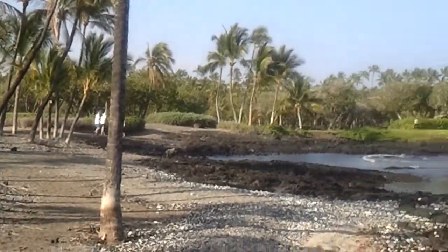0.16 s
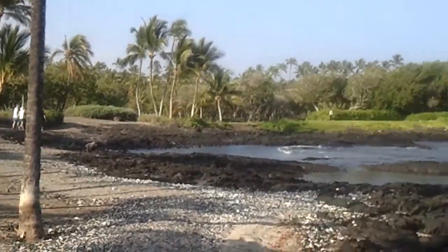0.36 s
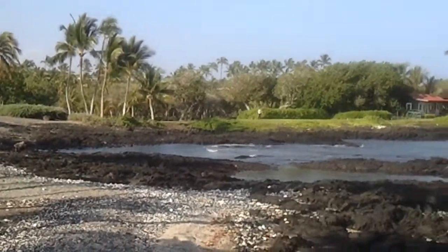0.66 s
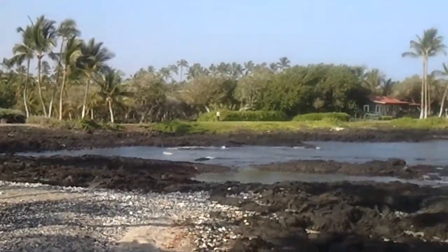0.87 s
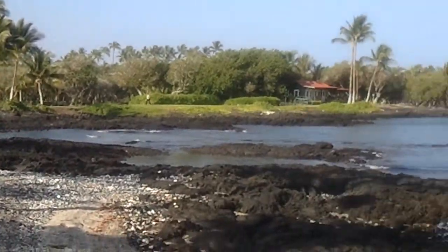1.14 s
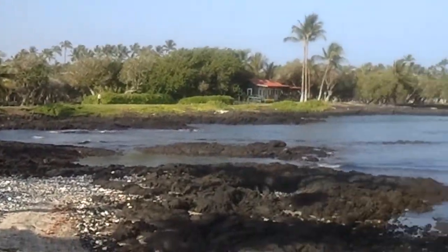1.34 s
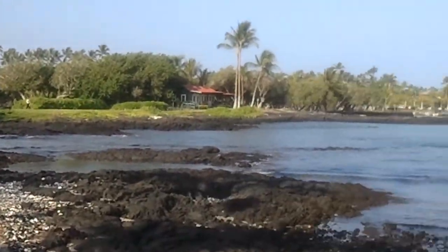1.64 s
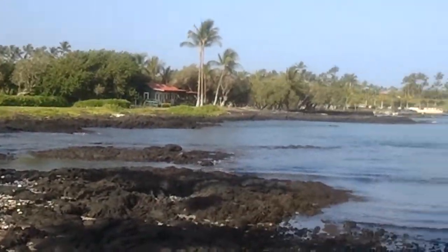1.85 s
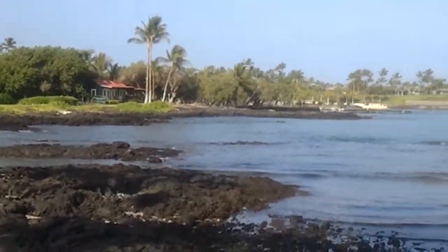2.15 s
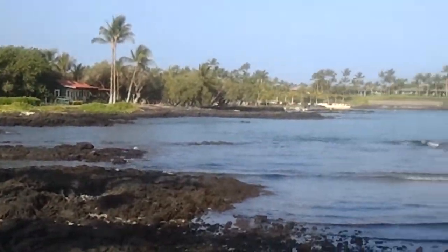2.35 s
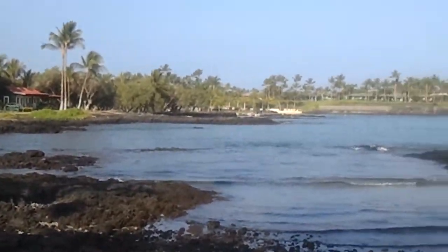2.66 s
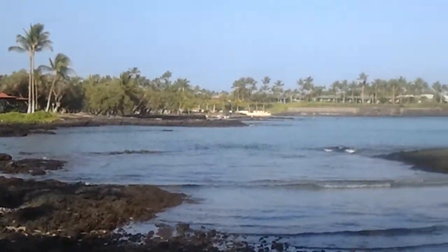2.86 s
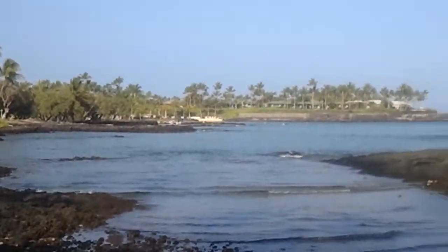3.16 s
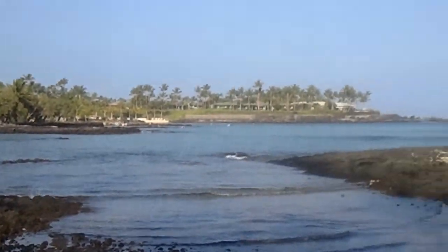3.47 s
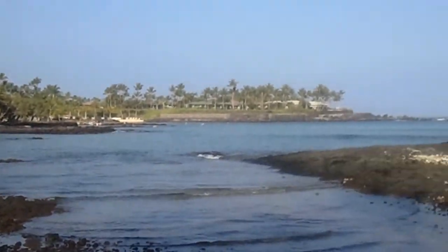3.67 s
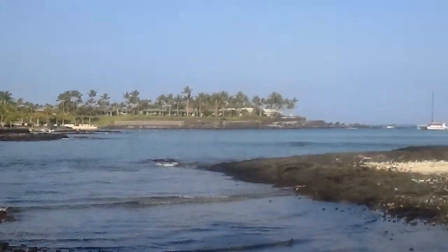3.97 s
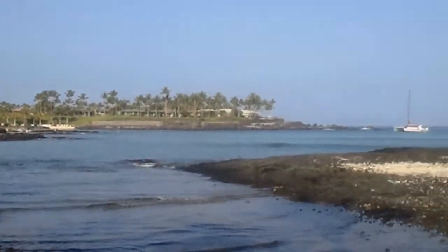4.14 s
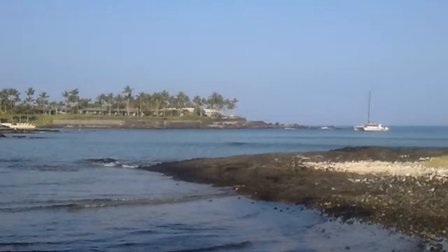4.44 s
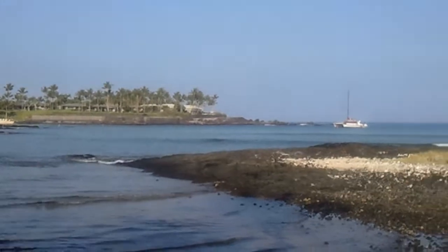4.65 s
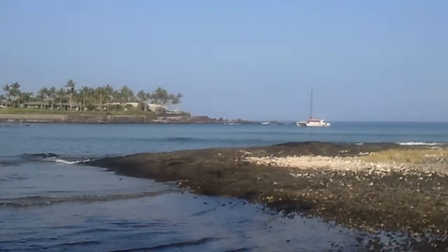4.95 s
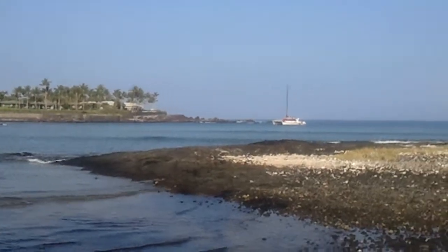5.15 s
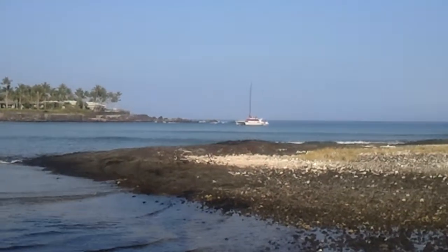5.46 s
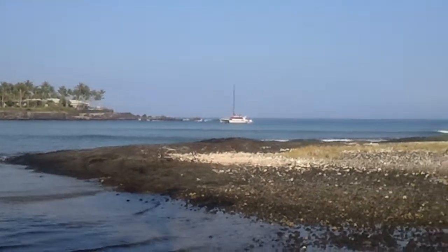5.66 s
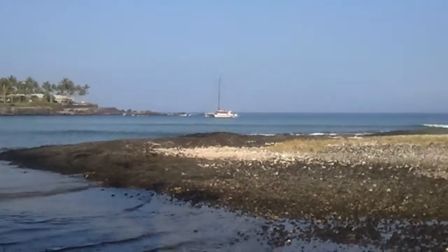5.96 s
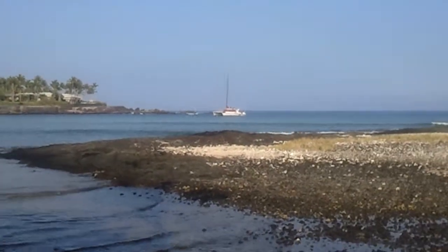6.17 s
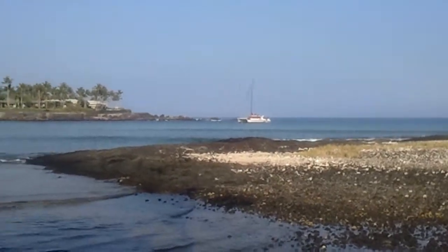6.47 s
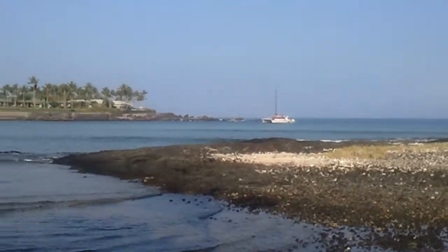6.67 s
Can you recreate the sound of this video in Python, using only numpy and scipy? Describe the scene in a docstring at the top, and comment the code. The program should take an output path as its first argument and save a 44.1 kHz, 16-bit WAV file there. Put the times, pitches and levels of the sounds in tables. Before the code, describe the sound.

On a rocky shore, distant surf and small waves make a quiet, continuous hiss. At the start, stones crunch and knock under two close steps while a nearby bird sings rapid chirps and pips. The bird soon stops, and others answer faintly from far away. A single pebble clicks midway, then the hiss shifts slightly in tone as the microphone turns seaward, with light lapping near the end.

```python
"""Gravel steps and birdsong above a rocky bay

Two steps crunch as stones slip underfoot, and a few pebbles click afterwards. A bird in the palms
whistles eight phrases (chatter and slur in turn, then pips twice); others answer from far away.
Far surf and small waves on the stones make a steady hiss, whose tone shifts as the microphone
turns seaward."""
import sys
import numpy as np
from scipy import signal
from scipy.fft import rfft, irfft, next_fast_len
from scipy.io import wavfile

SR = 44100
rng = np.random.default_rng(int(sys.argv[2]) if len(sys.argv) > 2 else 0)


def dump_mix(stems):
    """Bounce the given channels to the path in sys.argv[1] as a 16-bit WAV at rate SR."""
    frames = np.atleast_2d(stems).T  # one column per channel
    limited = np.clip(frames, -1, 1)  # hard clip at full scale
    pcm = np.round(limited * 32767).astype(np.int16)
    wavfile.write(sys.argv[1], SR, pcm)


N = 300321

# water running over the near stones: (time [s], relative level [dB])
WASH_LEVEL = [(0.0, -41.5), (0.11, -38.5), (0.51, -44), (0.62, -42), (1.5, -46), (2.09, -44), (2.16, -45.5),
              (2.47, -43), (2.71, -42), (4.42, -43.5), (4.65, -42), (6.03, -44), (6.81, -40.5)]
# the near bird's three tunes, note by note: (time in phrase [s], length [s], start pitch [Hz],
# middle pitch [Hz], end pitch [Hz], relative level [dB], rasp [0-1])
# an upward flick under a thin high arch, then two raspy falls
CHATTER = [(0, 0.076, 2600, 2720, 2450, -4.5, 0.55), (.008, .053, 3460, 3890, 3680, -5.5, .2),
           (.017, .015, 2250, 2780, 3280, 1.5, .22), (.069, .017, 3360, 2860, 2440, 1, 0.3),
           (.086, .044, 3003, 2400, 1940, -3, .6)]
# a hoarse climb, two quick drops onto a clear whistle, and a low last note
SLUR = [(0, .053, 2850, 3300, 3550, -13.5, .5), (.05, .013, 3570, 2840, 2710, -6.5, .3),
        (.062, .008, 3350, 2760, 2550, -2, 0.14), (.067, .018, 2553, 2473, 2440, 1.5, .04),
        (.085, .018, 2450, 2413, 2420, -1.5, .12), (.102, .028, 1700, 1898, 1920, -4.5, 0.19)]
# two pips, a thin squeak over the second, and a low falling rasp
PIPS = [(0, 0.0193, 3510, 3090, 3300, -4.5, 0.2), (.029, .023, 3194, 3054, 3330, 0, 0.14),
        (.033, .017, 6700, 6550, 6200, -14, .05), (.059, .068, 1786, 1454, 1290, -7, .75)]


def from_db(db):
    """Turn decibels into a number to multiply by."""
    return 10 ** (np.asarray(db) / 20)


def unit_power(x):
    """Scale a sound to an average power of 1."""
    return x / np.sqrt(np.mean(x ** 2) + 1e-20)


def add(out, s, sound):
    """Mix a sound in, starting at s seconds."""
    at = max(round(s * SR), 0)
    out[at:at + len(sound)] += sound[:N - at]


def in_time(rows):
    """Join (time, value) points with straight lines, one value per sample."""
    return np.interp(np.arange(N) / SR, *np.transpose(rows))


def band(x, low_hz, high_hz, order=2):
    """Keep the sound between two frequencies."""
    sos = signal.butter(order, [low_hz, min(high_hz, .45 * SR)], "band", fs=SR, output="sos")
    return signal.sosfilt(sos, x + 1e-18)


def drift(rate, size):
    """A random wander of about 1 either way, with rate new values a second."""
    points = rng.standard_normal(size // 8 + 2)
    return 1.2 * np.interp(np.arange(size) * rate / SR, np.arange(len(points)), points)


def swell(size, edge):
    """Fade in and out; edge is the share of time spent fading."""
    return signal.windows.tukey(size, edge)


def colour(x, spectrum, humps=()):
    """Shape the tone with a curve of level against frequency, plus rounded humps and dips."""
    size = 2 * next_fast_len(len(x) // 2 + 2048, True)
    hz = np.maximum(np.arange(size // 2 + 1) * SR / size, 1)
    points_hz, points_db = np.transpose(spectrum)
    db = np.interp(np.log(hz), np.log(points_hz), points_db)
    for centre, width, height in humps:
        db += height * np.exp(-2 * ((hz - centre) / width) ** 2)
    # make the filter ring only after a sound, never before it
    cepstrum = irfft(np.log(from_db(db)))
    cepstrum[1:size // 2] *= 2
    cepstrum[size // 2 + 1:] = 0
    return irfft(rfft(x, size) * np.exp(rfft(cepstrum)))[:len(x)]


def clicks(per_s, spread_db, size):
    """Random clicks of uneven strength, with an average power of 1."""
    strength = from_db(spread_db * np.minimum(rng.exponential(1, size), 3))
    return unit_power((rng.random(size) < per_s / SR) * strength * rng.choice([-1, 1], size))


def sea(surf_db=-0.24, wash_db=-0.5, foam_db=-51.3, spray_db=-55.0, ripple_db=0.72):
    """Surf fills the lows, wash the middle, foam and spray the top; droplets roughen the hiss."""
    # tone of the sea: (frequency [Hz], relative level [dB])
    tone = [(15, -59), (25, -29), (48, -24), (122, -6), (219, -6), (287, -4.5), (444, -6.5), (742, -1),
            (1100, -4), (1400, -4), (1970, -5.5), (2910, -8.5), (3800, -12), (7520, -20.5), (8500, -32.5),
            (11000, -63.5), (18700, -120)]
    # ground reflections, facing the cove or open water: (frequency [Hz], width [Hz], boost [dB])
    cove_humps = [(266, 260, 2), (420, 110, -2.5), (640, 140, 2), (960, 280, -3), (1236, 150, 3),
                  (1517, 150, -4.5), (1800, 330, 2), (3080, 230, -3.5)]
    open_humps = [(280, 150, 2), (457, 67, -2.5), (845, 140, 2.5), (1075, 210, -3), (1400, 200, 2.5),
                  (2120, 310, 2), (2796, 430, -3.5), (3940, 420, 4)]
    # the microphone turns: (time [s], share facing open water [0-1])
    turn = [(0, 0.05), (3.5, 0.09), (4.5, 0.53), (5.7, 0.98), (6.81, 0.99)]
    # swell of the far surf: (time [s], relative level [dB])
    surf_level = [(0.0, -48.5), (0.4, -48), (2.22, -48.5), (3.51, -45), (4.28, -47), (5.37, -47),
                  (5.78, -47.5), (6.81, -46.5)]
    seaward = in_time(turn)
    water, out = np.zeros((2, N))
    for share, humps in [(1 - seaward, cove_humps), (seaward, open_humps)]:
        hiss = rng.standard_normal(N) + 0.34 * clicks(per_s=700, spread_db=6, size=N)
        water += np.sqrt(share) * colour(hiss, tone, humps)
    surf, wash = in_time(surf_level), in_time(WASH_LEVEL)
    swing_db = 0.7 * (wash - wash.mean())   # foam and spray partly follow the wash
    layers = [(15, 900, surf + surf_db), (900, 3000, wash + wash_db),
              (3000, 4500, swing_db + foam_db), (4500, 12000, swing_db + spray_db)]
    size = next_fast_len(N, True)
    hz, spectrum = np.arange(size // 2 + 1) * SR / size, rfft(water, size)
    for low_hz, high_hz, db in layers:
        part = irfft(spectrum * ((hz >= low_hz) & (hz < high_hz)), size)[:N]
        out += unit_power(part) * from_db(db + ripple_db * drift(25, N))
    return out


def gurgle(below_wash_db=10, cycles=22):
    """Bubbles ring between the stones, each rising a little in pitch; their level follows the wash."""
    out = np.zeros(N)
    for hz in np.geomspace(600, 2400, 24):
        age = np.linspace(0, 1, int(cycles * SR / hz))
        bubble = np.sin(2 * np.pi * cycles * age * (1 + .05 * age)) * from_db(-30 * age)
        births = clicks(per_s=9, spread_db=3, size=N)
        out += unit_power(signal.oaconvolve(births, bubble)[:N])
    return unit_power(out) * from_db(in_time(WASH_LEVEL) - below_wash_db)


def lapping():
    """A small wave breaks into a burst of bubbles; a hollow in the rocks narrows its pitch range."""
    # waves slapping the rocks: (time [s], length [s], level [dB], pitch [Hz], width [share of pitch])
    slaps = [(4.58, 0.094, -46.5, 1890, 0.1), (4.911, 0.016, -46, 1600, 0.64),
             (5.085, 0.023, -44.5, 1450, 0.51), (6.313, 0.033, -48.5, 3980, 0.32),
             (6.636, 0.039, -41.5, 1700, .9)]
    out = np.zeros(N)
    for s, length, db, hz, width in slaps:
        size = int(length * SR)
        bubbles = clicks(per_s=1500, spread_db=5.6, size=SR)[:size]
        burst = band(bubbles, hz * (1 - width / 2), hz * (1 + width / 2))
        add(out, s, from_db(db) * unit_power(burst * swell(size, edge=0.9)))
    return out


def drops(decay_s=0.0006, small_per_s=1.1, small_db=-38):
    """Each drop of spray lands with a tiny bright tick; the small ones fall at random."""
    # larger drops close by: (time [s], peak level [dB])
    large = [(3.106, -33), (5.8948, -32.5), (5.954, -30.5), (6.767, -31)]
    small = [(at / SR, small_db) for at in np.flatnonzero(rng.random(N) < small_per_s / SR)]
    out, t = np.zeros(N), np.arange(SR // 200) / SR
    for s, db in large + small:
        tick = band(rng.standard_normal(len(t)) * np.exp(-t / decay_s), 2800, 7000)
        add(out, s, from_db(db) * tick / np.abs(tick).max())
    return out


def grove(x, fade_s=0.41, first_s=.006):
    """Trees and rocks scatter back many faint echoes, which fall by 60 dB in fade_s."""
    t = np.arange(SR // 2) / SR
    echoes = clicks(per_s=900, spread_db=1.1, size=len(t)) * from_db(-60 * t / fade_s) * (t > first_s)
    return signal.fftconvolve(x, echoes / np.sqrt(np.sum(echoes ** 2)))[:N]


def far_birds(width_hz=700, trill_db=1, trill_rate=80):
    """Many paths through the trees smear a far trill into a narrow, fluttering hiss."""
    # answering calls: (time [s], length [s], relative level [dB], pitch [Hz])
    calls = [(2.53, 0.17, -49.5, 3850), (2.62, 0.38, -53.5, 3830), (2.9, 0.2, -49.5, 3830),
             (3.62, .30, -54, 3660), (5.368, 0.27, -53.5, 3780), (6.571, 0.1, -52, 3850)]
    out = np.zeros(N)
    for s, length, db, hz in calls:
        size = int(length * SR)
        hiss = band(rng.standard_normal(SR), hz - width_hz / 2, hz + width_hz / 2, order=3)
        call = hiss * from_db(trill_db * drift(trill_rate, SR))
        add(out, s, from_db(db) * unit_power(call[:size] * swell(size, edge=0.45)))
    return out


def song_notes():
    """List the near bird's notes: three short tunes, repeated at varied speed and pitch."""
    # the song: (tune, time [s], length [factor], pitch [factor], relative level [dB])
    phrases = [(CHATTER, .100, .62, .93, -34), (SLUR, .227, 1.02, 1.01, -26),
               (CHATTER, .559, 0.99, 1.0, -34), (SLUR, .838, 1.02, 0.98, -26.5),
               (CHATTER, 1.146, 1.25, .94, -39), (SLUR, 1.430, .99, 1.0, -26.5),
               (PIPS, 1.798, 0.99, 1.0, -28), (PIPS, 2.098, 1.02, 0.98, -30)]
    # single notes slipped in: same columns as a tune, timed from the start of the scene
    extra_notes = [(0.082, .020, 2635, 2480, 2300, -32, 0.6), (.95, 0.027, 2205, 2083, 1840, -31.5, 0.34),
                   (1.77, 0.0097, 3400, 3920, 4400, -33, 0.2),
                   (1.775, 0.061, 4500, 4810, 4750, -42.5, 0.35),
                   (2.078, 0.022, 1990, 2105, 2080, -34, 0.2),
                   (2.162, 0.0196, 2530, 1950, 1730, -27.5, 0.1)]
    notes = []
    for tune, s, stretch, pitch, db in phrases:
        for after, length, start_hz, middle_hz, end_hz, note_db, rasp in tune:
            pitches = pitch * start_hz, pitch * middle_hz, pitch * end_hz
            notes.append((s + stretch * after, stretch * length, *pitches, db + note_db, rasp))
    return notes + extra_notes


def near_bird(wobble_hz=420, flutter_db=3.0, hoarse_db=-1, breath_db=-9, beak_hiss_db=9):
    """Each note is a bent whistle; rasp shakes its pitch and strength. Overtones ring in the beak."""
    # how wide the beak opens: (time [s], relative overtone level [dB])
    beak_opening = [(0.12, -22), (0.30, -10.5), (0.60, -17.5), (1.49, -8), (1.83, -14.5)]
    voice, overtones = np.zeros((2, N))
    longest = SR // 10
    for s, length, start_hz, middle_hz, end_hz, db, rasp in song_notes():
        size = min(int(length * SR), longest)
        bend = np.polyfit([0, .5, 1], [start_hz, middle_hz, end_hz], 2)
        wobble = rasp * wobble_hz * drift(900, longest)[:size]
        hz = np.polyval(bend, np.linspace(0, 1, size)) + wobble
        phase = 2 * np.pi * np.cumsum(hz) / SR
        flutter = from_db(np.sqrt(rasp) * flutter_db * np.minimum(drift(400, longest)[:size], 1))
        level = from_db(db) * unit_power(flutter) * swell(size, edge=0.31)
        # a raspy note trades its clear tone for noise around its pitch
        air = rng.standard_normal(longest)
        hoarse = unit_power(band(air, 0.7 * middle_hz, 1.316 * middle_hz, order=3))[:size]
        breath = np.sqrt(rasp) * from_db(breath_db) * band(air, 1000, 4200)[:size]
        whistle = np.sin(phase) / (1 + rasp ** 2)
        add(voice, s, level * (whistle + rasp * from_db(hoarse_db) * hoarse + breath))
        # tense, high notes make the beak ring most
        tension = np.clip(hz / 2600, 0, 1) ** 3
        beak_hiss = np.sqrt(rasp) * from_db(beak_hiss_db) * air[:size]
        buzz = np.sin(2 * phase) + 0.6 * np.sin(3 * phase) + beak_hiss
        add(overtones, s, level * tension * buzz)
    beak = from_db(in_time(beak_opening)) * band(overtones, 6070, 7120, order=3)
    return np.sqrt(2) * (voice + beak)


def pebbles(crack_hz=3400, crack_fade_s=0.0022, soft_cycles=15, hard_cycles=3.2):
    """A pebble rings until the gravel stills it; a harder knock cracks more and dies sooner."""
    # single pebbles knocking: (time [s], peak level [dB], pitch [Hz], hardness [0-1])
    knocks = [(0.04, -9, 1580, 0.5), (0.0557, -10.5, 1170, 0.75), (0.0640, -9.5, 1120, 0.1),
              (0.0907, -14, 1460, 0.3), (0.2938, -11.5, 1523, 0.4), (0.3053, -16.5, 1400, 0.57),
              (0.4866, -13, 1240, 0.33), (0.5085, -3.5, 1572, 0), (0.5122, -10, 1460, 0.2),
              (0.6635, -18, 1830, .5), (1.0917, -26, 5480, 0.1), (2.0620, -25, 2600, .8),
              (2.0722, -27, 2580, .8), (3.3688, -15.5, 1600, 0.93)]
    out, t = np.zeros(N), np.arange(SR // 40) / SR
    for s, db, hz, hardness in knocks:
        fade_s = np.interp(hardness, [0, 1], [soft_cycles, hard_cycles]) / hz
        ring = np.sin(2 * np.pi * hz * t) * from_db(-60 * t / fade_s)
        crack = np.sin(2 * np.pi * crack_hz * t) * from_db(-60 * t / crack_fade_s)
        knock = band(ring + hardness * crack, 550, 7200)
        add(out, s, from_db(db) * knock / np.abs(knock).max())
    return out


def footsteps(touch_db=-5, lift_db=-5.5, full_weight_share=.7):
    """Stones slip under the sole in a burst of dull clicks that grows with the weight, then fades."""
    # a shoe pressing into gravel: (time [s], length [s], level at full weight [dB])
    steps = [(0.033, 0.042, -20.5), (0.458, 0.077, -23)]
    # tone of the crunch: (frequency [Hz], relative level [dB])
    tone = [(59, -58), (100, -32), (249, -15.5), (418, -4.5), (913, -6.5), (1540, -2), (2270, -11),
            (2450, -7.5), (3000, -13), (3290, -11.5), (3890, -14), (4600, -25), (6680, -24.5), (8500, -41),
            (11000, -76), (18700, -120)]
    out = np.zeros(N)
    for s, length, db in steps:
        size = int(length * SR)
        weight_db = np.interp(np.linspace(0, 1, size), [0, full_weight_share, 1], [touch_db, 0, lift_db])
        weight = from_db(weight_db) * swell(size, edge=0.14)
        slips = clicks(per_s=2500, spread_db=3.5, size=SR // 10)[:size] * weight
        crunch = colour(np.pad(slips, (0, SR // 50)), tone)
        add(out, s, from_db(db) * crunch * np.sqrt(np.sum(weight ** 2) / np.sum(crunch ** 2)))
    return out


def scene():
    """Mix it all: palm leaves blur the near bird, and the grove echoes the birds and the gravel."""
    gravel, song, answers = footsteps() + pebbles(), near_bird(), far_birds()
    direct = gravel + from_db(-1.38) * song + from_db(0.3) * answers
    leaves = from_db(-12.5) * grove(song, fade_s=0.17, first_s=.002)
    echoes = grove(from_db(-10.5) * song + from_db(-19) * gravel + from_db(-2) * answers)
    water = sea() + gurgle() + lapping() + drops()
    return (direct + leaves + echoes + water)[None]


def record(dry):
    """The small recorder cuts the treble steeply above about 8 kHz."""
    low_pass = signal.firwin(161, cutoff=8650, window=("kaiser", 7), fs=SR)
    return signal.fftconvolve(dry, low_pass[None], mode="same")


dry = scene()
out = record(dry)
dump_mix(out)
```